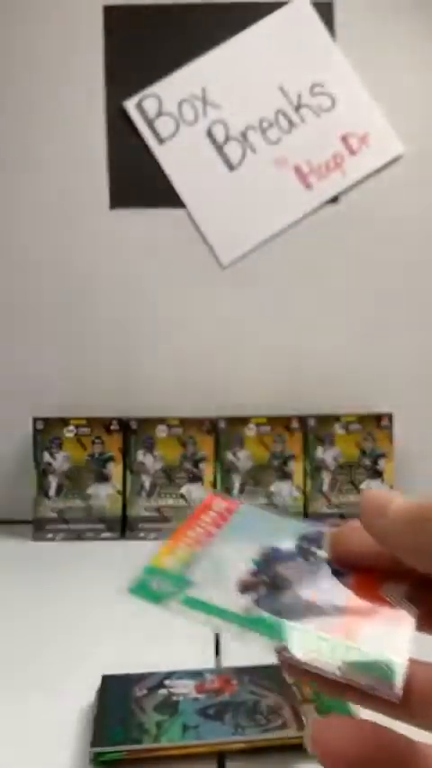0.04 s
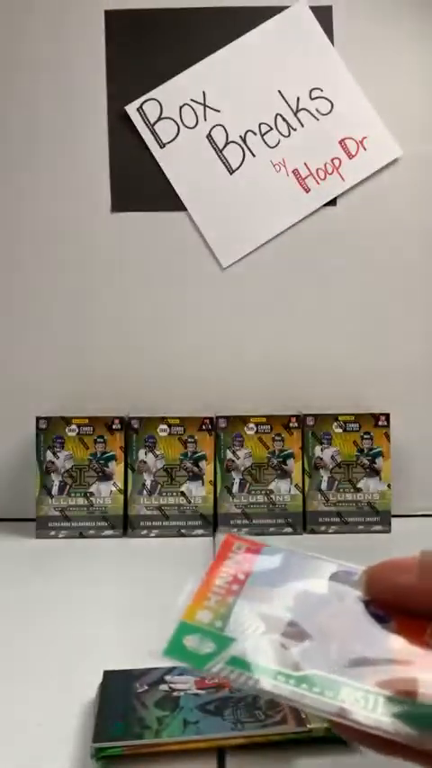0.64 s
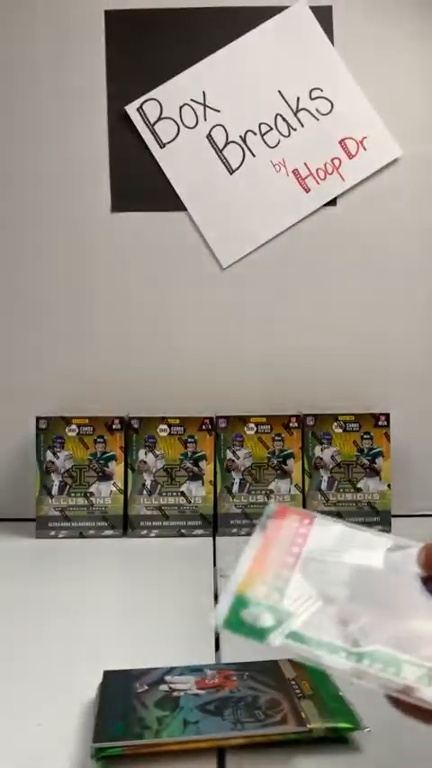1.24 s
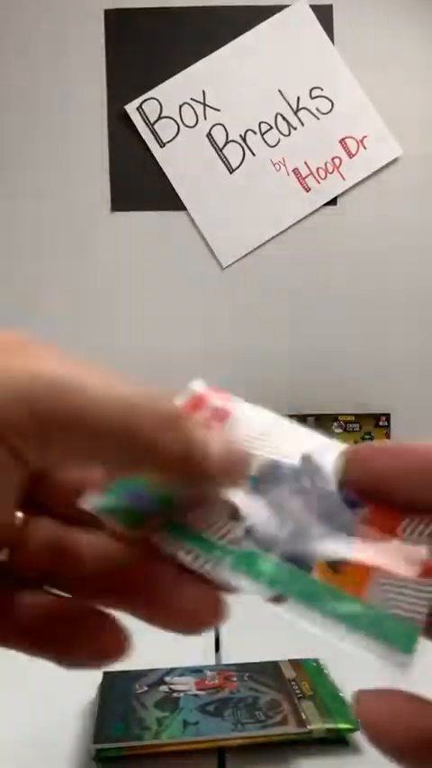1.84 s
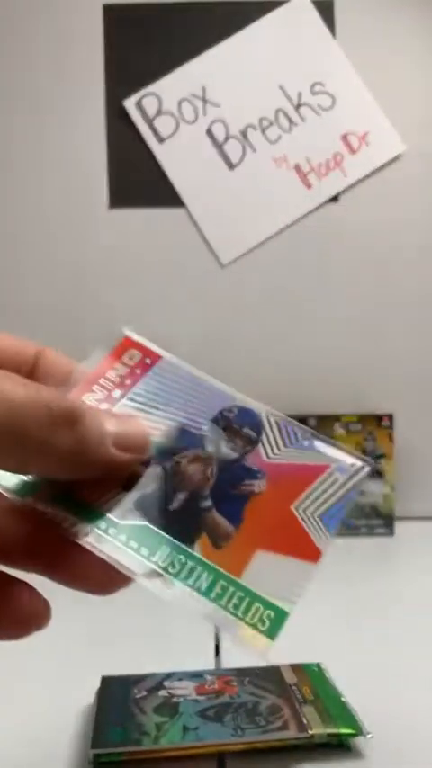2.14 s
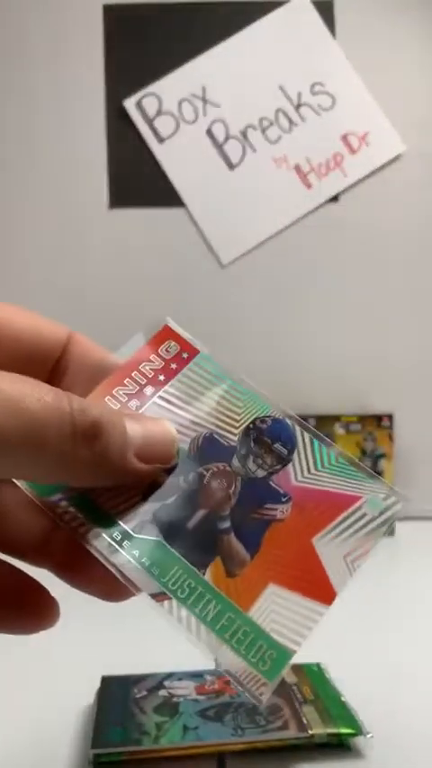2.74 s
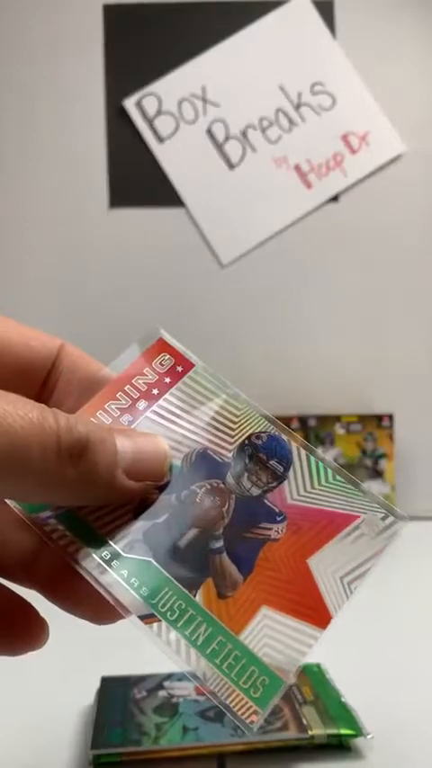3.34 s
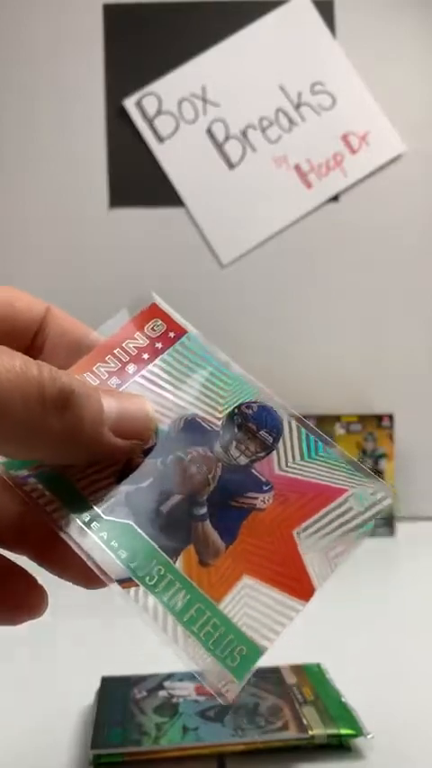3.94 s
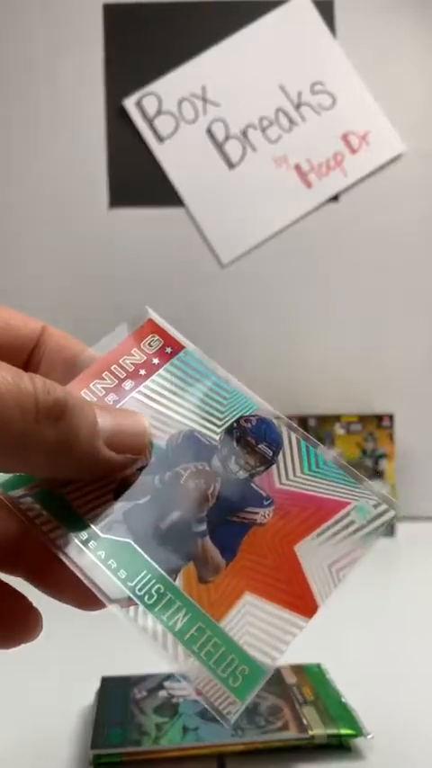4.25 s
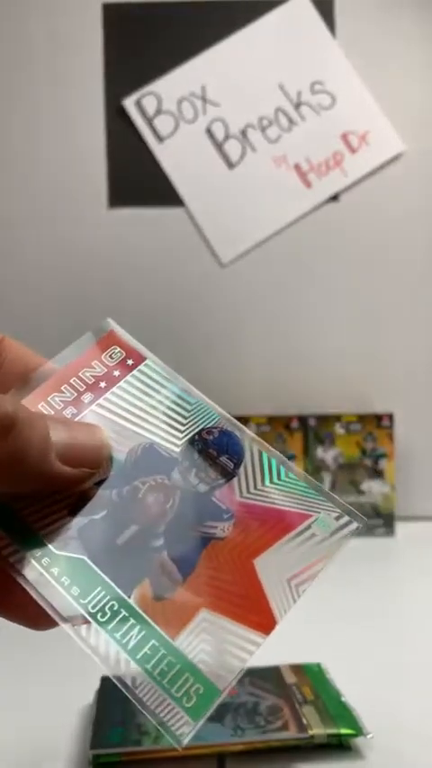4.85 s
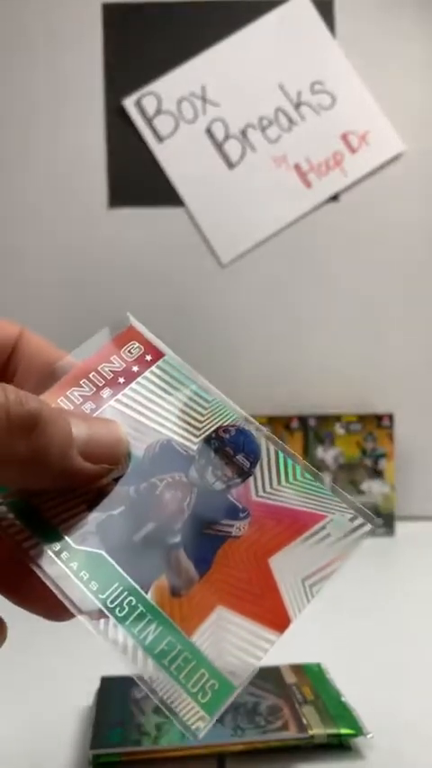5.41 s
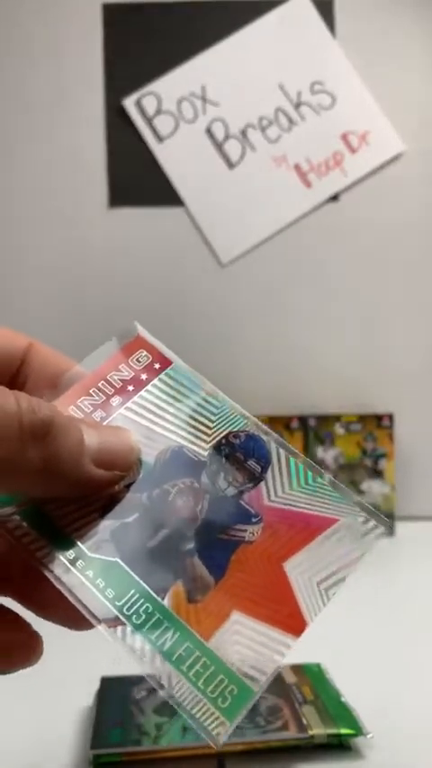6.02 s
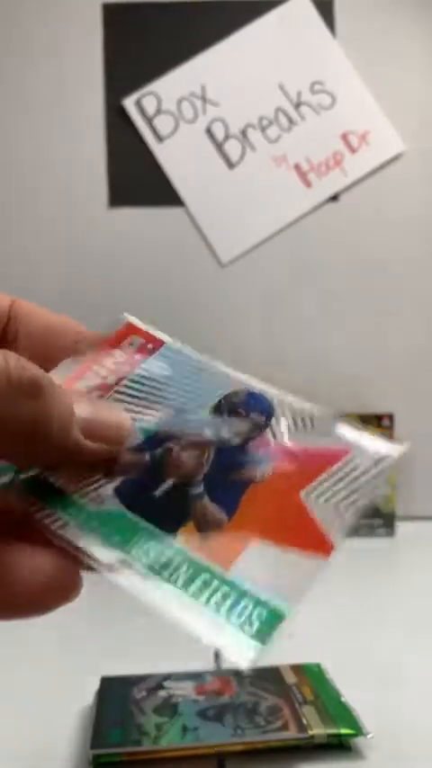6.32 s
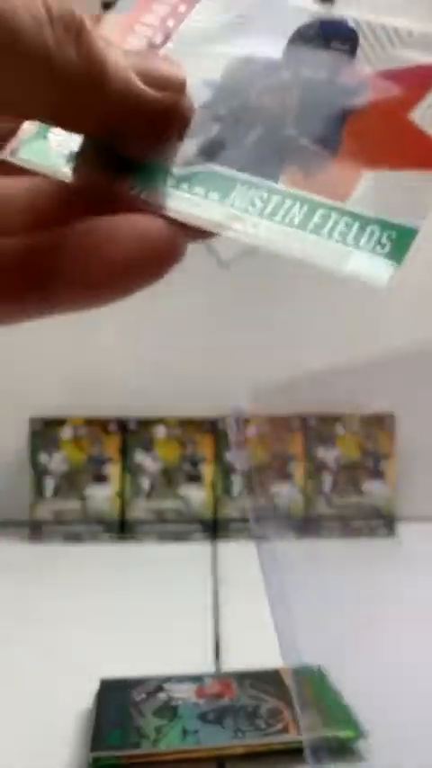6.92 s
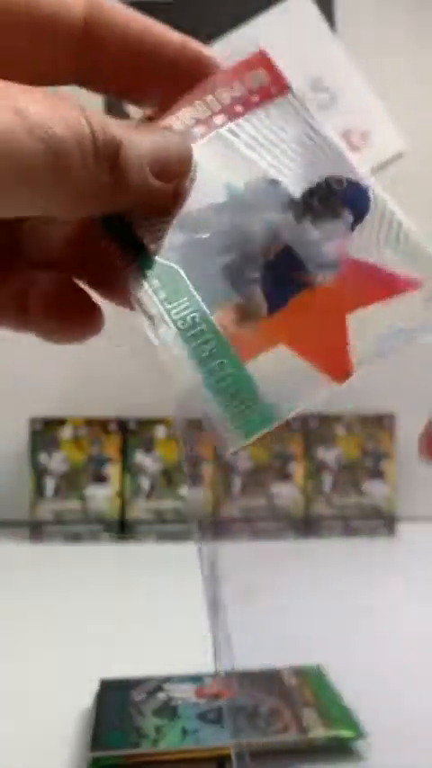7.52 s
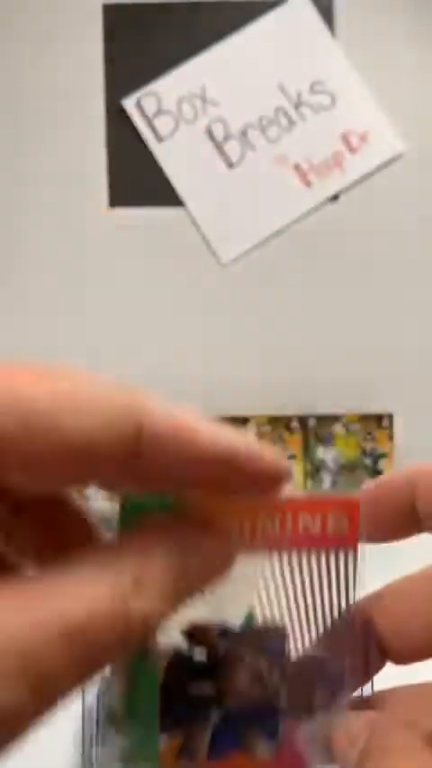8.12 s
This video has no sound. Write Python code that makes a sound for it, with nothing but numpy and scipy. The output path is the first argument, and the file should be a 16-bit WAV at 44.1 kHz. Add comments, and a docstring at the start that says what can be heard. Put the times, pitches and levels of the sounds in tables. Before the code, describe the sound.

A trading card in a thin plastic sleeve is handled, with light crinkles, clicks and a few soft knocks over a low fan hum.

```python
"""At a table in a small room, a phone's microphone close to the hands: a trading card in a thin plastic
sleeve is turned over and guided into a rigid holder. The sleeve buckles in snaps and crinkles, card and
fingers slide in tiny slips, and both ring the card's bending modes. A fingertip sticks and squeaks, and a
few soft knocks set the table top ringing. The room answers each sound over the low hum of a fan."""
import sys
import numpy as np
from scipy import signal
from scipy.fft import rfft, irfft
from scipy.io import wavfile
from scipy.ndimage import uniform_filter1d

SR = 44100
rng = np.random.default_rng(int(sys.argv[2]) if len(sys.argv) > 2 else 0)


def output_pcm(signal):
    """Save a mono or channel-first signal as 16-bit PCM at the path in sys.argv[1].

    Samples are clipped to [-1, 1] before scaling.
    """
    pcm = np.clip(np.atleast_2d(signal).T, -1, 1) * 32767
    wavfile.write(sys.argv[1], SR, np.round(pcm).astype(np.int16))


N = 360297
TIME = np.arange(N) / SR

# The card rings differently in each hold. Each entry, keyed by its start in seconds: grit from 0 to 1,
# glide in octaves per second, then modes and damped bands as centre in Hz, width in Hz, lift in dB.
HOLDS = { 0: (0.87, 0, [(644, 72, 0.5), (1190, 160, 2.5), (2300, 300, -3), (3730, 180, -3), (4200, 380, 3),
         (5400, 400, 2.5), (7700, 990, 2.5), (13400, 5500, -4)]), .8: (0.56, 0, [(368, 230, -3),
         (664, 230, 7), (3200, 100, 3.5), (3840, 200, 10), (5060, 510, 8), (5700, 160, 5), (9000, 3000, -2),
         (13400, 11000, -19.5)]), 1: (0.56, 0, [(348, 260, -4), (615, 140, 8.5), (1230, 140, 5),
         (1660, 210, -9), (2250, 400, 4), (3090, 150, 10), (3760, 260, 7.5), (4380, 200, 9),
         (5520, 300, 12.5), (6500, 280, 6), (7030, 400, 7.5), (13400, 5800, -11)]),
         1.1: (0.93, -.2, [(620, 200, 4.5), (1250, 230, 5), (2200, 400, 0), (3070, 160, 5.5),
         (3870, 340, 8.5), (4500, 330, 6), (5580, 430, 7.5), (13300, 4300, -5)]),
         1.4: (0.58, 0, [(584, 47, 10), (665, 53, 7.5), (870, 230, -0.5), (1260, 110, 7.5), (3100, 70, 5),
         (3570, 260, 7.5), (4130, 430, 3.5), (5530, 980, 3.5), (7500, 370, 2.5), (13340, 5500, -10.5)]),
         2.3: (0.38, 0, [(431, 150, 13), (3850, 220, 10), (4650, 200, 5.5), (5430, 150, -1),
         (5880, 200, 8.5), (6480, 150, 3), (7300, 370, 2), (8900, 480, 4)]),
         2.8: (0.26, 0, [(435, 200, 7.5), (1870, 280, 7), (2430, 220, 4), (3520, 1500, 4.5), (5330, 180, 6),
         (6630, 250, 6), (7770, 250, 2)]), 3.5: (.4, 0, [(432, 130, 9), (728, 160, 4.5), (1400, 350, 4.5),
         (2363, 200, 2), (1830, 200, 4), (3440, 220, -1.5), (4420, 450, 6), (4930, 270, 7),
         (5680, 200, 1.5), (6540, 300, 6), (6980, 290, 4), (8050, 220, 9.5), (9655, 500, 7)]),
         3.8: (0.28, 0, [(1740, 350, 4), (3220, 500, -1.5), (4630, 1500, 5.5), (6500, 200, 7.5),
         (7430, 580, 7), (8800, 250, 2)]), 3.97: (.5, 0, [(330, 110, -6), (620, 160, 4.5), (1310, 150, 3.5),
         (1580, 220, 0.5), (2310, 300, 6.5), (3570, 320, -1), (4130, 510, 8), (4770, 250, 3.5),
         (5370, 540, 6.5), (8000, 1100, 4.5)]), 4.25: (0.6, 0, [(560, 160, 12), (1400, 900, 1.5),
         (2485, 500, 5.5), (3120, 200, 1.5), (3950, 320, 6), (4520, 470, 4), (6440, 500, 2),
         (9150, 1200, 4), (13000, 4000, 1.5)]), 4.6: (0.55, 0, [(2510, 400, 3), (4500, 600, 6),
         (5060, 600, 7), (6270, 450, 6), (7650, 600, 5), (11300, 700, 4.5)]), 4.8: (0.2, 0, [(724, 320, -2),
         (1380, 410, 6), (2360, 500, 1), (4500, 800, 4.5), (5550, 780, 1.5), (7700, 1600, 0),
         (13460, 3900, -11)]), 5.01: (0.85, -.2, [(717, 380, 2.5), (1450, 590, 5), (3100, 330, 6.5),
         (4670, 480, 6), (5250, 770, 7), (6600, 700, 1.5), (7800, 1800, 7), (9400, 900, 3),
         (13460, 3900, 1)]), 5.21: (0.79, 0, [(1520, 500, 4.5), (3800, 600, 5), (5470, 970, 5.5),
         (7900, 1500, 7.5), (9740, 640, 5.5), (13460, 4300, -3)]), 5.9: (0.39, -0.24, [(1800, 1100, 7.5),
         (3440, 840, 6.5), (4030, 300, 7), (4400, 270, -11), (4820, 380, 12), (5620, 430, 3),
         (6300, 500, -6.5), (7300, 1500, 8)]), 6.08: (0.46, -0.44, [(646, 400, -5), (13000, 2500, 2),
         (1510, 400, 10.5), (1870, 300, 14.5), (2520, 300, 7), (3220, 250, 15), (3950, 240, -9),
         (5740, 300, 9), (6370, 210, 7), (6950, 500, 14), (9040, 800, 10), (9800, 350, 15)]),
         6.155: (0.86, 0, [(650, 360, -10), (13500, 3500, 7), (1600, 320, 13.5), (2440, 260, 10.5),
         (3200, 370, 9), (3820, 320, 9), (5320, 500, 9), (6800, 970, 12.5), (8670, 650, 11.5),
         (9700, 290, 10)]), 6.27: (0.26, 0, [(600, 260, -6.5), (1610, 200, 5), (3750, 540, 0),
         (4960, 700, -0.5), (6000, 950, 1), (11800, 5000, -6)]), 6.435: (.02, .1, [(2560, 410, 5),
         (3500, 500, 9), (4850, 500, -8), (5900, 550, 14), (7000, 700, -2)]),
         6.595: (0.07, .1, [(2560, 410, -6), (3970, 750, 6.5), (4900, 500, -3), (5930, 650, 10.5),
         (7200, 700, -6)]), 7.3: (.6, 0, [(1143, 160, 5.5), (2800, 1000, -4.5), (5070, 1300, 5),
         (6750, 910, 4)]), 7.9: (0.53, 0, [(3300, 300, 0), (4080, 170, 9), (9300, 2700, 8), (11550, 900, 9),
         (14300, 4500, 11)]), 8.03: (0.44, 0, [(1370, 300, 3), (4560, 1000, 4), (6140, 1400, 6.5)]), }


def snaps(gain_db=-2, spike=5.7, lead_in_s=0.0016, lead_in_db=-6, flex_t60_s=0.031, room_db=-3):
    """A faint, very short swell of noise leads into one sharp crack; the buckled plastic flexes on."""
    # Snaps of sleeve and card edge. Each row: start in seconds, relative treble level in dB, pitch in Hz,
    # weight (body over treble) in dB, crack (top over treble) in dB, room share in dB.
    buckles = [(0.118, -71, 5970, 6, -10, -24), (0.33, -66.5, 5160, -7, -8, 1.5),
               (0.5744, -67, 1150, -3, -12, 6.5), (0.6455, -52, 715, -2.5, -15, -4),
               (0.852, -66, 5200, -6, -9, -5), (0.9, -60, 750, 4.5, -16, -11),
               (0.969, -60, 5500, -1, -8, -7), (0.991, -53, 7800, 1.5, 1, -1),
               (1.0118, -41, 3840, -2.5, -9, -4), (1.0228, -48, 5570, -1, -8, -16),
               (1.0486, -48, 3500, -1, -18, -12), (1.056, -60, 655, 8.5, -20, -12),
               (1.132, -45.5, 3470, -5.5, -15, -1.5), (1.152, -65.5, 855, 20.5, -30, -3),
               (1.215, -63.5, 3820, -1, -33, -3), (1.253, -66, 3360, -1, -24, -7),
               (1.5442, -54, 6560, 2.5, 2.5, -4.5), (1.5538, -60, 1290, 9, -6, -1.5),
               (1.6837, -50.5, 5530, -8, -5, -10), (1.692, -44.5, 670, -3.5, -4, 1),
               (1.7045, -47, 4200, -8, -1, -10), (1.7095, -51.5, 2480, 4, -9, -3),
               (1.722, -56, 2000, 6, -7, -10), (1.7331, -48.5, 5300, -7, 0, -3.5),
               (2.037, -76, 7600, 4, 0, 4), (2.0687, -58, 2480, -4, -8, -5.5),
               (2.078, -65, 1800, 4.5, -6, -9), (2.145, -77, 2700, 7, -7, -11),
               (2.454, -66, 6300, -2.5, -8, 2.5), (2.4701, -55, 5530, -11, -6.5, -3),
               (2.9223, -68, 5450, -10, -5, 3), (2.936, -60.5, 6800, -6, -6, -11),
               (3.5804, -35, 6500, -10.5, -8.5, -2.5), (3.589, -57, 4900, 9, -15, -0.5),
               (3.8472, -56, 1850, -5, -10, 1), (4.014, -61.5, 7900, -4, -3, -5),
               (4.098, -43, 1370, 8, -14, -3), (4.15, -47, 6300, -2, -5.5, -2.5),
               (4.183, -60, 5050, -5, -5, -14), (4.2916, -42.5, 6100, -11.5, -15, -4),
               (4.2945, -50.5, 2850, -2.5, -21, -1), (4.317, -58.5, 6170, 0, -8, -2),
               (4.344, -54.5, 4000, -3, -3, -11), (4.357, -54, 7500, -11, -13, 2.5),
               (4.3642, -48.5, 2470, -7, -14, -11), (4.371, -58, 4020, 2, -14, -7),
               (4.478, -69, 6000, -9, -10, -6), (4.526, -57, 5950, -13, -9, -3),
               (4.548, -69.5, 4500, 0.5, -5, -6), (4.6532, -43, 5440, -12, -1.5, -15),
               (4.711, -61, 7100, -7, -8, -17), (4.717, -54, 7000, -8.5, -4.5, -11),
               (4.831, -57.5, 2730, 10.5, -27, -4.5), (5.0225, -48.5, 5120, -14, -17, -3),
               (5.037, -62, 1900, 13, -7, -4), (5.0863, -47.5, 4860, -4, -15, -4),
               (5.1427, -64.5, 5200, -18, -7, -9), (5.159, -62, 6000, -4, -7, -12),
               (5.1674, -57.5, 4290, -5, -5, -23), (5.1995, -64, 5220, -14, -18, -7),
               (5.225, -54.5, 7600, -1.5, -5, -4), (5.229, -59, 2190, -5, -5, -7),
               (5.256, -67, 5600, -7, 1, -12), (5.3178, -64.5, 4000, -16, -7, -10),
               (5.329, -65, 3740, -7.5, -6, -11), (5.467, -72, 6550, -2, -16, -10),
               (5.7527, -48.5, 7700, -9, -11, -11), (6.06, -63, 6440, -3, -5, -14),
               (6.104, -57, 3250, -4.5, -15, -10), (6.113, -52, 6500, -17, -12, -14),
               (6.163, -51, 3270, 1, -7, -16), (6.1673, -52.5, 2440, -0.5, -10, -20),
               (6.1704, -55, 3300, 3.5, -6, -18), (6.2023, -59, 3180, -10, -3.5, -3),
               (6.327, -54, 6660, -7, -7, -17), (6.337, -55, 5830, -4, -7, -23),
               (6.3491, -54, 2670, 4.5, -8, -22), (6.353, -65, 1260, 11.5, -8, -25),
               (6.36, -64, 7500, -4, 0, -7), (6.3665, -62, 7500, -2, -2, 1),
               (6.372, -62.5, 6500, -6, -3, 4), (6.4033, -60.5, 6540, -1, 0, -6),
               (6.427, -68, 6500, -8, 1, -4), (6.822, -73, 7500, -2, -7, -12),
               (7.542, -70, 6530, 0, -15, -17), (7.5541, -51, 1190, 3.5, -6.5, -29),
               (7.9628, -71, 8950, 4, -3, -4), (7.972, -64, 9000, -4, -11, -10),
               (8.0654, -56.5, 3300, -2.5, -8, -7)]
    # Body, middle, treble and top of a snap. Each row: lower and upper edge in Hz.
    bands = [(300, 1000), (1000, 3000), (3000, 8000), (8000, 15500)]
    density_db = 10 * np.log10(SR / 2 / np.diff(bands)[:, 0] * SR / 100)  # band power spans 10 ms
    direct, to_room = np.zeros(N), np.zeros(N)
    crack_at = SR // 250
    t = TIME[:2 ** 12] - crack_at / SR
    hz = bins(len(t))
    click = signal.unit_impulse(len(t), crack_at)
    for start, db, pitch_hz, weight_db, crack_db, share_db in buckles + crinkles():
        t60 = flex_t60_s * 2 ** (weight_db / 17)  # a heavier snap flexes longer
        envelope = np.exp(np.minimum(t / lead_in_s, -np.log(1000) * t / t60)) * amp(lead_in_db * (t < 0))
        crack = spike * amp(0.24 * (db + 53)) * click  # a harder snap buckles more cleanly
        snap = disperse(crack + rng.standard_normal(len(t)) * envelope)
        body, mid, treble, top = db + np.array([weight_db, 0.77 * weight_db, 0, crack_db]) + density_db
        shape = [(120, body - 16), (330, body), (650, body), (1400, mid), (2400, mid), (3600, treble),
                 (7300, treble - 3), (8600, top + 3), (12500, top - 3.5), (15800, top - 16)]
        ring_db = card_db(hz, start, wander=.004, vary=.1)
        tone_db = along(shape, hz) + patch_db(hz, pitch_hz) + ring_db + gain_db
        begin = start - (crack_at - SR // 1500) / SR
        add(direct, begin, colour(snap / np.linalg.norm(snap), tone_db))
        add(to_room, begin, colour(click, tone_db + share_db))  # the walls blur the flexing into one burst
    return direct + amp(room_db) * room(to_room)


def crinkles(per_s=16, over_rub_db=4.5, scatter_db=2, low_hz=2500, high_hz=8040):
    """The rubbed sleeve crinkles: rows of faint random snaps, louder under a hard, gritty rub."""
    chance = rng.random((2 ** 8, 5))
    times = np.cumsum(.5 + chance[:, 0]) / per_s
    pitches = low_hz * (high_hz / low_hz) ** chance[:, 1]
    scatter = scatter_db * np.sqrt(12) * (.5 - chance[:, 2:])
    rub = stroke_gain(0) * np.sqrt(grit_at(TIME))
    rub_db = 20 * np.log10(np.interp(times, TIME, rub, right=1e-9))
    level_db = rub_db + over_rub_db + scatter[:, 0]
    weight_db, crack_db = -2 + 2 * scatter[:, 1], -8 + scatter[:, 2]
    share_db = np.full(len(times), -15)
    rows = np.c_[times, level_db, pitches, weight_db, crack_db, share_db]
    return list(rows[rub_db > -85])


def disperse(x, travel_s=0.001512):
    """High bending waves cross the card sooner, so a crack becomes a very short falling chirp."""
    hz = np.maximum(bins(len(x)), 1)
    turns = 2 * travel_s * np.sqrt(1000 * hz) - hz * travel_s / 2
    return irfft(rfft(x) * np.exp(-2j * np.pi * turns), len(x))


def patch_db(hz, pitch_hz, lift_db=6, width_octaves=0.24):
    """The patch of plastic that buckles favours one broad pitch."""
    return lift_db * np.exp(-.5 * (np.log2((hz + 1) / pitch_hz) / width_octaves) ** 2)


def card_db(hz, time_s, wander=.016, vary=0.32):
    """The card's bending modes glide as it slides; each contact point detunes and weights them anew."""
    held_since = max(s for s in HOLDS if s <= time_s)
    _, glide, modes = HOLDS[held_since]
    mode_hz, width, db = np.transpose(modes)
    detune, weight = rng.standard_normal((len(modes), 2)).T
    centre_hz = mode_hz * 2 ** (glide * (time_s - held_since)) * (1 + wander * detune)
    off_centre = 2 * (hz[:, None] - centre_hz) / width
    lift = np.sum(db * (1 + vary * weight) / (1 + off_centre ** 2), axis=1)
    return lift - 10 * np.log10(np.mean(amp(lift[hz < 8000]) ** 2))


def slides(room_db=-6):
    """Sliding shakes the card's body, scrapes its edge in gritty bursts and hisses off the sleeve."""
    # Spectra of body, edge and sleeve. Each row: frequency in Hz, relative level in dB.
    body_tone = [(100, -5), (220, 11), (400, 14.5), (640, 4), (1000, 2), (1800, -85)]
    edge_tone = [(500, -47), (1000, 9), (1500, 8), (2500, 4.5), (3300, 1.5), (5000, -38)]
    sleeve_tone = [(1800, -53), (3200, 3.5), (5000, 4), (7300, 1.5), (8500, -3.5), (9900, -6.5),
                   (10500, -15.5), (13500, -16), (15800, -33)]
    rumble = friction(slips_per_s=3300, spread_db=-0.5, chatter_db=3)
    scrape = friction(slips_per_s=600, spread_db=2.5, chatter_db=4.5)
    hiss = friction(slips_per_s=1400, spread_db=4.5, chatter_db=4.0)
    layers = [(rumble, body_tone, 1, -1), (scrape, edge_tone, 0.28, -4), (hiss, sleeve_tone, 0, -2)]
    hz, out = bins(N), 0
    for source, tone, weight_share, db in layers:
        shaped = unit(irfft(rfft(source) * amp(along(tone, hz)), N))
        out = out + shaped * stroke_gain(weight_share) * amp(db)
    return out + amp(room_db) * room(out)


def friction(slips_per_s, spread_db, chatter_db):
    """Tiny uneven slips over a smooth rub come in bursts and ring the card as the contact wanders."""
    sizes = amp(spread_db * np.minimum(rng.exponential(size=N), 3))
    slipping = rng.random(N) < slips_per_s / SR
    slips = unit(slipping * rng.choice([-1, 1], N) * sizes)
    grit = grit_at(TIME)
    chatter = amp(chatter_db * grit * unit(uniform_filter1d(rng.standard_normal(N), SR // 150)))
    force = chatter * (np.sqrt(grit) * slips + np.sqrt(1 - grit) * rng.standard_normal(N))
    hz, times, frames = signal.stft(force, SR, nperseg=2 ** 11)
    ring = np.transpose([amp(card_db(hz, s)) for s in times])
    return signal.istft(frames * ring, SR)[1][:N]


def stroke_gain(weight_share, attack_s=0.013, release_t60_s=0.21):
    """Envelope of the strokes: each grips quickly, swells or fades, and dies as the hand lets go."""
    # Strokes of card and fingers. Each row: start and length in seconds, relative hiss level in dB,
    # swell from start to end in dB, weight (body over hiss) in dB.
    strokes = [(0.01, 0.42, -86, -14, 9), (2.634, 0.031, -79, -9, -13), (2.928, 0.057, -73, -5, 8),
               (7.404, 0.034, -83, 1, 3), (0.499, 0.029, -75.5, -1, -13), (0.657, 0.025, -78, -4, 28.5),
               (0.832, 0.1, -64, 4.5, 16), (0.962, 0.075, -59.5, 3.5, 16), (1.119, 0.16, -76, -6.5, 24),
               (1.534, 0.12, -63.5, -5, 4.5), (1.617, 0.022, -65.5, 9, 17),
               (1.635, 0.072, -59.5, 3.5, 17.5), (2.058, 0.058, -89, -8, 14), (3.077, 0.023, -73.5, 5, 9),
               (3.251, 0.032, -72.5, 0, -7), (3.883, 0.059, -73.5, 3, 3), (4.014, 0.079, -72.5, 10.5, 2),
               (4.152, 0.063, -68, 3, -3), (4.322, 0.07, -67.5, 3, 4), (4.457, 0.065, -73.5, -5, 1),
               (4.639, 0.067, -66.5, -11, 0), (4.829, 0.093, -64.5, -4.5, 14.5),
               (4.937, 0.12, -69.5, 12, 14), (5.08, 0.11, -64, -10, -1), (5.237, 0.023, -68, 4, -22),
               (5.283, 0.025, -70, 5, -11), (5.412, 0.05, -76, 6.5, -2), (5.95, 0.14, -64, 12, -5),
               (6.088, 0.074, -56.5, -14, -5), (6.254, 0.096, -72, 3, -4), (6.44, 0.06, -80, -2, -15),
               (6.51, 0.045, -73.5, 1, -6), (6.6, 0.048, -69, 4, -14), (6.668, 0.17, -75, -1, -11),
               (7.526, 0.021, -67, 10.5, 10), (7.676, 0.11, -82.5, 1, 7), (7.891, 0.072, -75, 23, -6),
               (8.04, 0.15, -77.5, -3, -2)]
    power = np.full(N, 1e-14)
    for start, length, db, swell_db, weight_db in strokes:
        first = int(start * SR)
        t = TIME[:min(SR, N - first)]
        attack = np.minimum(t / attack_s, 1)
        held_db = db + weight_share * weight_db + swell_db * (np.minimum(t / length, 1) - .5)
        release = np.exp(-np.log(1000) * np.maximum(t - length, 0) / release_t60_s)
        power[first:first + len(t)] += (amp(held_db) * attack * release) ** 2
    return np.sqrt(power)


def grit_at(times):
    """How rough the contact is in the hold of that moment."""
    grits = np.clip([grit for grit, _, _ in HOLDS.values()], .001, 1)
    return grits[np.searchsorted(list(HOLDS), times, "right") - 1]


def knocks(contact_cycles=0.45, room_db=-13):
    """A soft contact swings the struck spot of the table; the top rings on."""
    # Hand and holder meet the table. Each row: start in seconds, peak of the swing in dB, pitch in Hz,
    # t60 in seconds.
    contacts = [(0.648, -39, 394, 0.06), (1.554, -48, 227, 0.067), (1.692, -35.5, 389, 0.078),
                (1.6977, -29, 131, 0.17), (2.088, -51, 283, 0.2), (2.136, -41.5, 131, 0.44),
                (3.588, -44, 427.6, 0.07), (4.657, -38, 345, 0.03), (4.834, -40, 614, 0.021),
                (4.8557, -16, 345, 0.035), (4.87, -28, 247, 0.041), (4.882, -25, 292, 0.035),
                (5.087, -45, 273, 0.023), (5.756, -44, 310, 0.016), (5.762, -40.5, 960, 0.0054),
                (7.5552, -31, 203, 0.057)]
    # Modes of the table top. Each row: frequency in Hz, relative level in dB, t60 in seconds.
    table_modes = [(266, -43.5, 0.093), (370, -24.5, 0.14), (523.5, -15.5, 0.089), (640, -9.5, 0.019),
                   (1410, -30, 0.082)]
    out, t = np.zeros(N), TIME[:SR // 3]
    ring = sum(amp(db - 60 * t / t60) * np.sin(2 * np.pi * hz * t) for hz, db, t60 in table_modes)
    for start, db, hz, t60 in contacts:
        swing = np.sin(2 * np.pi * hz * t) * amp(-60 * t / t60)
        push = 1 - np.exp(-(t * hz / contact_cycles) ** 2)
        swing /= np.max(np.abs(swing * push))
        add(out, start, -amp(db) * push * (swing + ring))
    return out + amp(room_db) * room(out)


def squeaks(waver=0.045, overtone_db=-9, room_db=-7):
    """Skin sticks and slips on the sleeve fast enough to give a brief, unsteady pitch."""
    # Each row: start and length in seconds, level in dB, pitch in Hz, glide in octaves per second.
    fingertip_slips = [(0.052, 0.0077, -67.5, 2230, 8), (0.07, 0.014, -77, 2630, -9),
                       (0.319, .02, -71, 4600, 10), (2.475, 0.024, -69, 5350, -2),
                       (5.962, .035, -76, 4830, -1.5)]
    out, t = np.zeros(N), TIME[:SR // 10]
    for start, length, db, hz, glide in fingertip_slips:
        drift = unit(uniform_filter1d(rng.standard_normal(len(t)), SR // 1000))
        phase = 2 * np.pi * np.cumsum(hz * 2 ** (glide * t) * (1 + waver * drift)) / SR
        tone = np.sin(phase) + amp(overtone_db) * np.sin(2 * phase)
        swell = np.sin(np.pi * np.minimum(t / length, 1))
        add(out, start, amp(db) * np.sqrt(2) * swell * tone)
    return out + amp(room_db) * room(out)


def room(x, gap_s=0.00079, build_s=0.0013, treble_db=-5, echo_s=0.019, echo_db=-17):
    """The small room returns a short diffuse tail and one echo off the near wall."""
    # Decay of the room. Each row: frequency in Hz, t60 in seconds.
    decays = [(150, 0.34), (400, 0.28), (1000, 0.28), (2500, 0.32), (6500, 0.25), (9000, 0.24),
              (15000, 0.48)]
    t = TIME[:SR // 2]
    hz = bins(len(t))
    noise = np.exp(2j * np.pi * rng.random(len(hz))) * amp(along([(7500, 0), (10000, treble_db)], hz))
    tail = 0
    for share, (_, t60) in zip(np.eye(len(decays)), decays):
        band = along(np.c_[np.array(decays)[:, 0], share], hz)
        tail = tail + irfft(noise * band, len(t)) * amp(-60 * t / t60)
    tail *= np.clip((t - gap_s) / build_s, 0, 1)
    tail /= np.linalg.norm(tail)
    tail[int(echo_s * SR)] += amp(echo_db)
    return signal.fftconvolve(x, tail)[:N]


def fan(hum_hz=124.4, hum_db=-67):
    """Steady air noise in the background, lifted at the room's low resonances, with a mains hum."""
    # Fan and moving air. Each row: frequency in Hz, level in dB per Hz.
    air_spectrum = [(20, -113), (32, -109), (45, -96), (70, -83), (190, -83), (300, -88.5), (400, -92),
                    (600, -101), (1000, -110), (2000, -118), (4000, -123), (9000, -127), (11000, -133),
                    (16000, -137)]
    # Room resonances that the fan excites. Each row: centre and width in Hz, level in dB per Hz.
    resonances = [(57, 17, -88), (78.4, 16, -76), (118.5, 21.5, -67), (142, 11, -69.5), (167, 2.1, -77.5),
                  (218.3, 21, -76), (251, 12, -81.5), (291, 22.2, -78.5), (386, 20, -100)]
    hz = bins(N)
    power = amp(along(air_spectrum, hz)) ** 2
    for centre_hz, width, db in resonances:
        power += amp(db) ** 2 / (1 + 2 * ((hz - centre_hz) / width) ** 2) ** 3
    air = irfft(rfft(rng.standard_normal(N)) * np.sqrt(power * SR / 2), N)
    return air + amp(hum_db) * np.sqrt(2) * np.sin(2 * np.pi * hum_hz * TIME)


def amp(db):
    """Decibels to gain."""
    return 10 ** (np.asarray(db) / 20)


def unit(x):
    """Scale to rms 1."""
    return x / np.sqrt(np.mean(x ** 2))


def along(points, hz):
    """Read (Hz, value) points on a log-frequency axis."""
    point_hz, value = np.transpose(points)
    return np.interp(np.log(hz + 1), np.log(point_hz), value)


def bins(size):
    """Frequencies of a spectrum in Hz."""
    return np.fft.rfftfreq(size, 1 / SR)


def colour(x, db):
    """Causal filter with the given gain in each frequency bin."""
    cepstrum = irfft(np.log(amp(db)), len(x))
    cepstrum[1:] *= 2
    cepstrum[len(x) // 2:] = 0
    return irfft(rfft(x) * np.exp(rfft(cepstrum)), len(x))


def add(track, start, sound):
    """Mix a sound in at a time in seconds."""
    i = int(start * SR)
    track[i:i + len(sound)] += sound[:N - i]


def scene():
    """Card, table and fan reach one microphone close to the hands."""
    return (fan() + slides() + knocks() + snaps() + squeaks())[None]


def record(dry):
    """The phone cuts the top steeply above 15.9 kHz."""
    return signal.sosfilt(signal.ellip(10, .2, 70, 15900, fs=SR, output="sos"), dry)


dry = scene()
out = record(dry)
output_pcm(out)
```